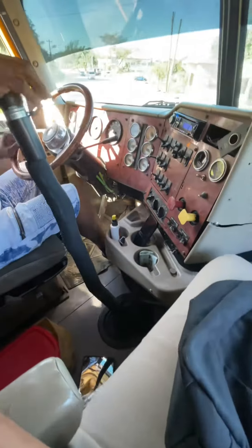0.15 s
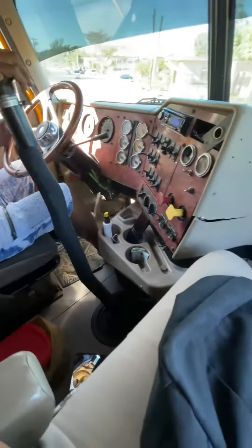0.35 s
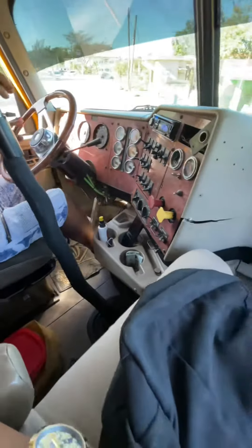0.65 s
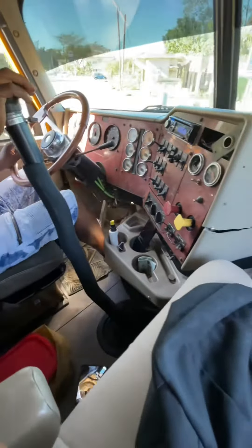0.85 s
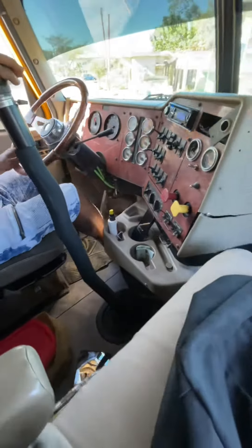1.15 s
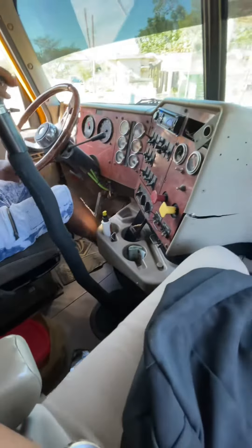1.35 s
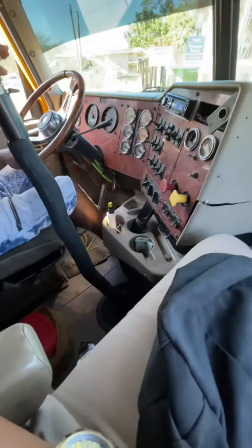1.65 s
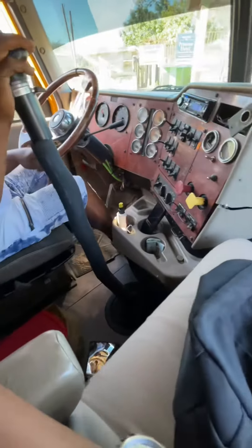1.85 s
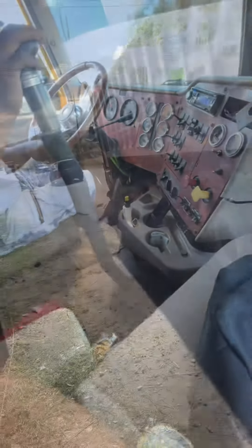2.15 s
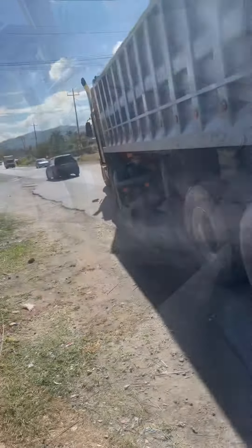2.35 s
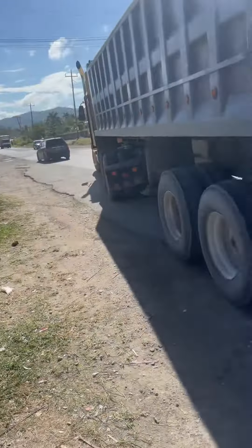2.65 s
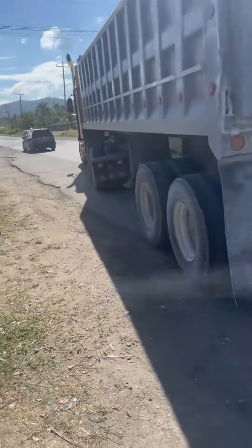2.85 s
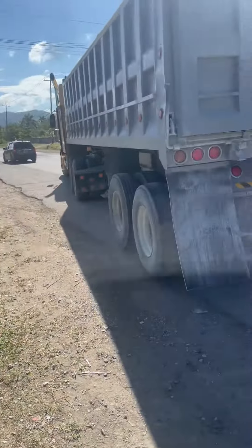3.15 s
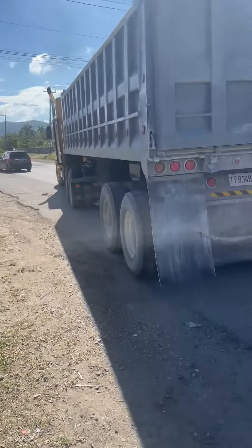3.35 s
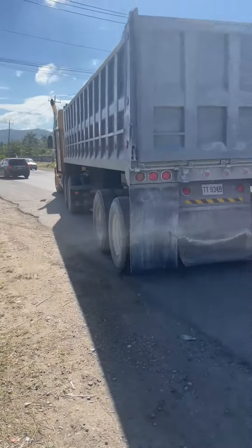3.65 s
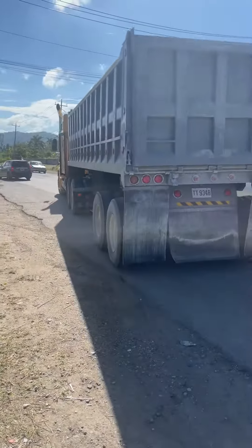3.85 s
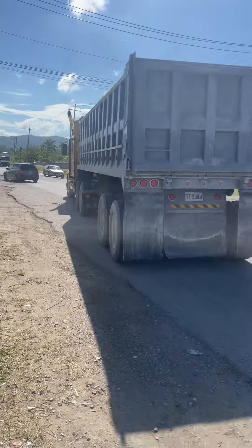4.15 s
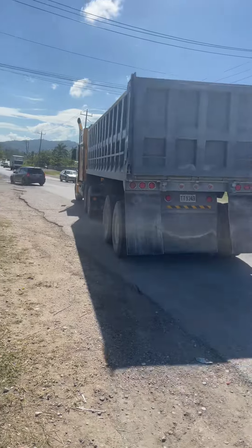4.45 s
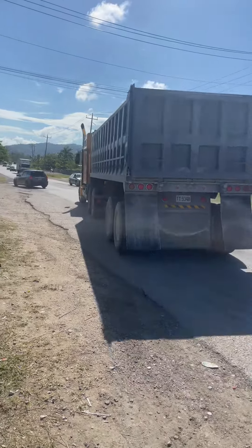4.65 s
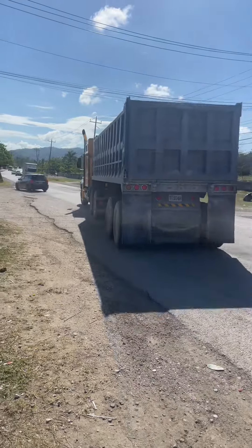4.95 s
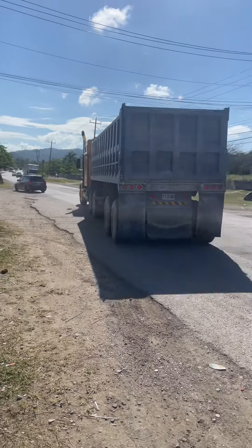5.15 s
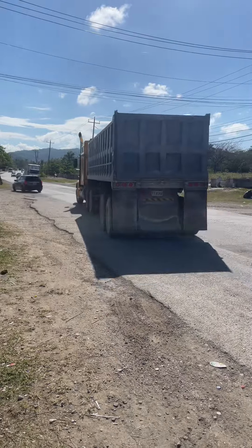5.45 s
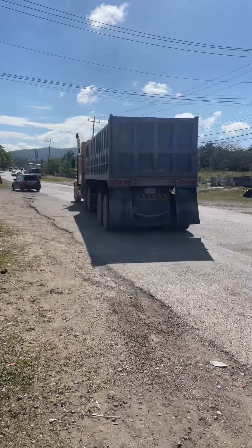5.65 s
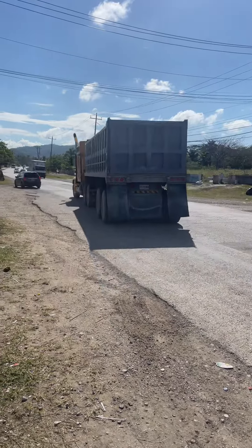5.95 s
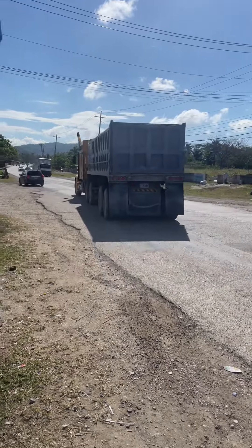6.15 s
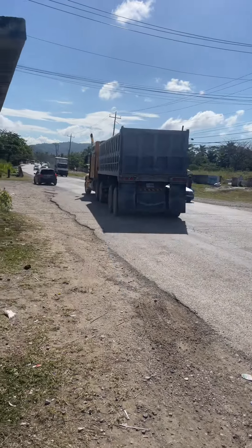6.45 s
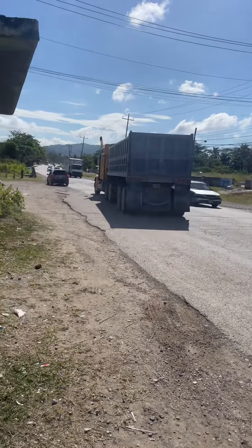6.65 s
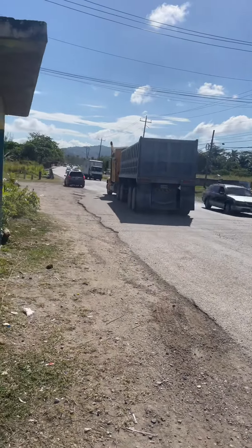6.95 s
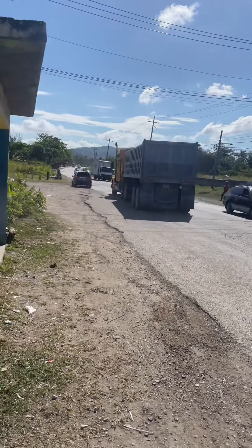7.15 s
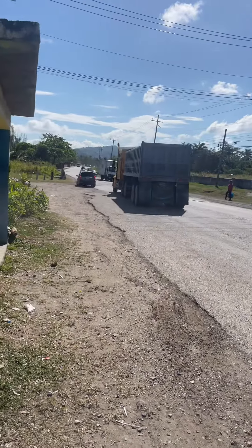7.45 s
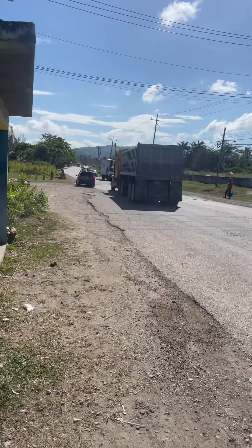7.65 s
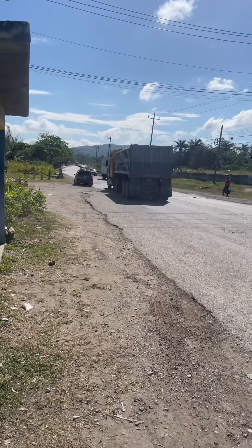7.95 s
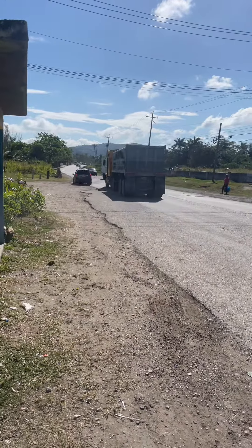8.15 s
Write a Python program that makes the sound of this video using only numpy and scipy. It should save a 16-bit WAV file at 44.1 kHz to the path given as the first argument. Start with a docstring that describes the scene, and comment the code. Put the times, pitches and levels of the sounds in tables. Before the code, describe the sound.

From 0 to 2.1 seconds we are inside a truck cab: a thick, muffled diesel drone sinks in pitch, panels boom and ring near 1.2, low shudders come around 1.5 and 1.7, and two short valve puffs hiss near 1.65 and 1.8. At 2.1 the sound cuts sharply to the roadside. The open exhaust roars in five pulls, about 2.1-3.1, 3.7-4.5, 4.9-5.6, 6.0-6.6 and 7.1-8.0. Each bites abruptly with hollow barks, rasp and sharp knocks, climbs slightly, then lifts off into a smoother falling drone. Intake air rushes through, with thin high whistles near 3.3 and 4.8. Tyres and trailer rumble, and running gear sings briefly around 3.5 as the axles pass. The rolling noise recedes, road reflections colour the exhaust, and after 8 the revs sink again. Wide, close outdoor stereo.

```python
"""A six-cylinder diesel truck with open stacks, first from inside the cab: the revs sink towards idle,
firings drone through the floor, panels boom, and valves let out puffs of filtered noise.
Then from the roadside it pulls away through five gears, each firing a pressure step and a gas puff
that growls, barks and rasps from the stack and bounces off the road. Between gears turbo air and a
thin whistle come through, with the noise of tyres and trailer; at the end the revs sink again."""
import sys
import numpy as np
from scipy import signal
from scipy.fft import rfft, irfft
from scipy.io import wavfile
from scipy.ndimage import uniform_filter1d, minimum_filter1d

SR = 44100
rng = np.random.default_rng(int(sys.argv[2]) if len(sys.argv) > 2 else 0)


def put_to_file(sound):
    """Save the sound as 16-bit audio at rate SR, in the file named by the first command-line argument."""
    columns = np.atleast_2d(sound).T  # one column per channel
    safe = np.clip(columns, -1, 1)
    whole_steps = np.round(safe * 32767)
    wavfile.write(sys.argv[1], SR, whole_steps.astype(np.int16))


N = 365588
TIME = np.arange(N) / SR  # s
BINS = np.fft.rfftfreq(2 ** 19, 1 / SR)  # Hz


def amp(db):
    """Decibels to gain."""
    return np.exp(np.asarray(db) * (np.log(10) / 20))


def unit(x):
    """Scales to rms 1."""
    return x / np.sqrt(np.mean(x ** 2) + 1e-20)


def curves(rows):
    """Each column of a table after the first as a curve over time."""
    s, *columns = np.transpose(rows)
    return [np.interp(TIME, s, column) for column in columns]


def read(points, hz):
    """A spectrum's value at hz, interpolated along log frequency."""
    f, value = np.transpose(points)
    return np.interp(np.log(hz + 1), np.log(f + 1), value)


def response(points, size=8192):
    """Causal, minimum-phase impulse response with the given spectrum."""
    hz = abs(np.fft.fftfreq(size, 1 / SR))
    log_gain = np.log(amp(np.maximum(read(points, hz), -100)))
    spectrum = np.exp(np.conj(signal.hilbert(log_gain)))
    return np.fft.ifft(spectrum).real[:size // 2]


def colour(x, points):
    """Filters to the given spectrum, rms 1."""
    return unit(signal.oaconvolve(x, response(points))[:N])


def drift(rate_hz, size=2 ** 14):
    """Smooth random wandering, rms 1."""
    s = np.linspace(0, N / SR, size)
    hz = np.fft.rfftfreq(size, s[1])
    smooth = irfft(rfft(rng.standard_normal(size)) / (1 + (hz / rate_hz) ** 4))
    return unit(np.interp(TIME, s, smooth))


def hiss(points, flutter_db):
    """Turbulent noise whose level flutters."""
    return colour(rng.standard_normal(N) * amp(flutter_db * drift(21)), points)


def tone(turns):
    """A sine of rms 1 from its running count of cycles."""
    return np.sqrt(2) * np.sin(2 * np.pi * turns)


def resonate(x, hz, width):
    """One damped resonance; hz may be a curve."""
    r = np.exp(-np.pi * width / SR)
    if np.ndim(hz) == 0:
        return signal.lfilter([1 - r], [1, -r * np.exp(2j * np.pi * hz / SR)], x).real
    # a moving resonance: shift it down to zero frequency, smooth, shift back
    turn = np.exp(2j * np.pi * np.cumsum(hz) / SR)
    return (turn * signal.lfilter([1 - r], [1, -r], x * turn.conj())).real


def resonate_twice(x, hz, width):
    """Two equal resonances in a row, for a steeper peak."""
    return resonate(resonate(x, hz, width), hz, width)


def ring(x, modes):
    """Rings a duct's narrow resonances."""
    return sum(amp(db) * unit(resonate(x, hz, width)) for hz, width, db in modes)


def steady(x, size=6000):
    """Holds the slow level at rms 1."""
    power = uniform_filter1d(uniform_filter1d(x ** 2, size), size // 2)
    return x / np.sqrt(abs(power) + 1e-9)


def swell(s, length):
    """A bell-shaped rise and fall centred on s."""
    return np.exp(-np.minimum((2 * (TIME - s) / length) ** 2, 20))


def burst(s, length):
    """A swell centred on s with a flatter top and steeper sides."""
    return np.exp(-np.minimum((2 * (TIME - s) / length) ** 4, 20))


def reflections(x, decay_s, size=4096):
    """A dense cluster of dying echoes, its spectrum flattened so that only phases are scrambled."""
    t = np.arange(size) / SR
    taps = rng.standard_normal(size) * np.exp(-t / decay_s)
    even = irfft(np.exp(1j * np.angle(rfft(taps))))
    return signal.oaconvolve(x, even)[:N]


def shifting(x, decay_s, rate):
    """Echoes whose pattern keeps changing, turning between two clusters."""
    angle = 2 * np.pi * rate * (TIME + drift(0.95) / 10)
    return np.cos(angle) * reflections(x, decay_s) + np.sin(angle) * reflections(x, decay_s)


def firings(turns, cylinders, uneven_db, rough, puff_s):
    """One pressure step a firing, followed by a short puff of turbulent gas."""
    size_db, lag_s = np.transpose(cylinders)
    n = np.arange(1, int(turns[-1]))
    cylinder = n % len(lag_s)
    at = np.interp(n, turns, np.arange(N)) + SR * lag_s[cylinder]
    at = np.clip(at, 0, N - 1).astype(int)
    chance = np.clip(rng.standard_normal(len(n)), -2, 2)
    kicks = np.zeros(N)
    kicks[at] = amp(size_db[cylinder] + uneven_db * chance)
    puff_level = signal.lfilter([1], [1, -np.exp(-1 / (puff_s * SR))], kicks)
    puffs = puff_level * rng.standard_normal(N)
    return np.sqrt(1 - rough) * unit(kicks - kicks.mean()) + np.sqrt(rough) * unit(puffs)


# The bounce off the road, heard from the roadside; close up the trailer screens it.
# Each row: time in seconds, comb spacing in Hz, strength from 0 to 1.
ROAD_BOUNCE = [(2.1, 369, 0.17), (2.8, 402, 0.18), (3.75, 470, 0.37), (4.25, 500, 0.4), (4.95, 532, 0.52),
               (5.4, 571, 0.32), (6.0, 621, 0.55), (6.55, 642, 0.56), (7.1, 772, 0.64), (7.4, 775, 0.95),
               (7.85, 885, 0.5), (8.3, 970, 0.3)]


def mirrored(x):
    """The road mirrors the stack; the echo closes in as the truck draws away."""
    spacing_hz, strength = curves(ROAD_BOUNCE)
    echo = np.interp(TIME - 1 / spacing_hz, TIME, x)
    return (x + strength * echo) / np.sqrt(1 + strength ** 2)


def off_road(x):
    """A running sound with its road echo, held at rms 1."""
    return steady(mirrored(x))


# Tyres, gears and trailer from the roadside. Each row: time in seconds, level in dB.
ROLLING_LEVEL = [(2.1, -19), (3.2, -21.5), (3.6, -22.5), (4.7, -21.5), (5.8, -23.5), (6.85, -24.5),
                 (8.29, -28)]
# Their tone. Each row: frequency in Hz, relative density in dB per Hz.
ROLLING_SPECTRUM = [(20, -33.5), (45, -5), (80, -1), (170, 0.5), (260, 1), (500, -11), (700, -9),
                    (1050, -13), (1600, -17), (2100, -23.5), (2750, -30), (3300, -33), (4400, -43),
                    (7000, -59.5), (12000, -56.5)]


def rolling():
    """Tyres and trailer rumble along the road as broad noise, heard direct and with its road echo."""
    roar = hiss(ROLLING_SPECTRUM, flutter_db=1.5)
    level_db, = curves(ROLLING_LEVEL)
    return amp(level_db) * unit(off_road(roar) + roar)


# The trailer's running gear singing as it passes the roadside.
# Each row: centre in seconds, length in seconds, pitch in Hz, width of each resonance in Hz, level in
# dB before the swell.
AXLE_TONES = [(3.426, 0.3, 955, 130, -33), (3.45, 0.23, 1376, 130, -34), (3.5, 0.16, 4330, 350, -43),
              (3.577, 0.22, 5220, 480, -39)]


def running_gear():
    """Rubbing noise excites narrow tones that swell and fade as the trailer's axles draw past."""
    rub = rng.standard_normal(N) * amp(5.2 * drift(45))
    out = np.zeros(N)
    for s, length, hz, width, db in AXLE_TONES:
        out += amp(db) * swell(s, length) * unit(resonate_twice(rub, hz, width))
    return out


# The turbo's air from the roadside, added to a steady flow.
# Each row: centre in seconds, length in seconds, intake hiss in dB, turbo spill in dB.
AIR_RUSHES = [(2.455, 0.61, -34.5, -54), (3.337, 0.34, -36.5, -63), (3.66, 0.49, -36, -54),
              (4.747, 0.31, -35.5, -64), (4.956, 0.23, -36, -47), (5.77, 0.42, -42, -63),
              (6.33, 0.5, -34.5, -61), (6.894, 0.61, -50, -61), (7.404, 0.37, -37, -74),
              (8.157, 0.27, -44, -61)]
# The whistle of the turbo running down between gears.
# Each row: centre in seconds, length in seconds, pitch at the centre in Hz, level in dB.
TURBO_WHISTLE = [(3.336, 0.3, 9260, -50), (4.833, 0.3, 9900, -53.5)]
# Tone of the intake hiss. Each row: frequency in Hz, relative density in dB per Hz.
INTAKE_SPECTRUM = [(1500, -23.5), (2300, 12), (2750, 8.5), (3400, 5.5), (4300, 1.5), (4900, 1), (5600, -3),
                   (6700, 2.5), (7600, -18), (9000, -15), (12000, -50.5)]
# Narrow resonances of the intake ducts. Each row: frequency in Hz, width in Hz, level in dB re the hiss.
INTAKE_DUCTS = [(2660, 200, -9), (3000, 160, -6.5), (4343, 230, -15), (5530, 370, -12.5)]
# Tone of the spilled air. Each row: frequency in Hz, relative density in dB per Hz.
SPILL_SPECTRUM = [(6000, -38), (7700, -9.5), (8600, 10), (9800, 3.5), (11500, 0), (13000, -10.5),
                  (15000, -15)]
STEADY_INTAKE_DB, STEADY_SPILL_DB = -41.5, -57.5  # flow between rushes
WHISTLE_SINK_HZ_PER_S = 1700


def turbo():
    """Air hisses through the intake and spills, with a thin whistle, as the load comes off and on."""
    intake, spill, whistle = amp(STEADY_INTAKE_DB), amp(STEADY_SPILL_DB), 0
    for s, length, intake_db, spill_db in AIR_RUSHES:
        rush = swell(s, length)
        intake = intake + amp(intake_db) * rush
        spill = spill + amp(spill_db) * rush
    for s, length, hz, db in TURBO_WHISTLE:
        turns = np.cumsum(hz - WHISTLE_SINK_HZ_PER_S * (TIME - s)) / SR
        whistle = whistle + amp(db) * swell(s, length) * tone(turns)
    flow = hiss(INTAKE_SPECTRUM, flutter_db=1.5)
    ducted = unit(flow + ring(flow, INTAKE_DUCTS))
    # the whistle's level wavers at random
    return whistle * drift(160) + intake * ducted + spill * hiss(SPILL_SPECTRUM, flutter_db=1.8)


# Air let out by the gearshift valves, inside the cab.
# Each row: centre in seconds, length in seconds, level in dB.
VALVE_PUFFS = [(1.654, 0.08, -45.5), (1.778, 0.059, -48)]


def valves():
    """Short bursts of filtered noise as the gearshift valves let out air."""
    level = sum(amp(db) * burst(s, length) for s, length, db in VALVE_PUFFS)
    return level * hiss([(1500, -7), (3500, 2), (6000, 1), (12000, -17)], flutter_db=1.5)


# The cab shuddering on its mounts.
# Each row: centre in seconds, length in seconds, pitch in Hz, level in dB.
CAB_SHUDDERS = [(1.46, .15, 58, -22), (1.67, .13, 58, -23)]


def shudder():
    """Brief low tones as the cab shudders on its mounts."""
    return sum(amp(db) * burst(s, length) * tone(hz * TIME) for s, length, hz, db in CAB_SHUDDERS)


# Engine speed heard from the cab. Each row: time in seconds, firing rate in Hz.
CAB_FIRING_RATE = [(0.0, 80.3), (0.12, 71.48), (0.55, 67.7), (0.8, 61.4), (1.0, 54.6), (1.29, 48.28),
                   (1.41, 44.56), (1.6, 43.02), (1.86, 46.17)]
# Levels in the cab. Each row: time in seconds, drone in dB before the harmonic's own level, engine
# growl in dB, panel boom in dB before a cut of 8.5 dB.
CAB_MIX = [(0.0, 0, -17, -11.5), (0.5, 2.5, -16.5, -14.5), (0.95, -5.5, -20.5, -13.5),
           (1.2, -7.5, -21.5, -20), (1.4, -6.5, -28.5, -11.5), (1.52, -45, -37, -17.5),
           (1.68, -22, -32.5, -18.5), (1.78, -26, -43.5, -29), (1.88, -9.5, -34, -47),
           (2.12, -11, -30.5, -20)]
# How loudly the cab carries a firing harmonic. Each row: frequency in Hz, level in dB.
CAB_HARMONICS = [(44, -18.5), (55, -10.5), (66, -19), (76, -34.5), (98, -21.5), (112, -29), (135, -16.5),
                 (150, -26), (168, -6), (200, -30.5), (220, -19.5)]
# Pulses as they reach the cab, in firing order. Each row: strength in dB, lag in seconds.
CAB_PULSES = [(0, 0), (-4, .0015), (-2, -.0012), (-1, .0003), (-4.5, .0018), (-2, -.001)]
# A cab panel ringing out as the revs sink through it: centre in seconds, length in seconds, rise in dB.
RINGING_PANEL = (1.22, 0.88, 6.1)
# Tone of the growl through the cab's body. Each row: frequency in Hz, relative density in dB per Hz.
CAB_GROWL_SPECTRUM = [(70, -24.5), (140, -14), (230, 4), (270, -3.5), (300, -10), (370, -2.5), (440, 1),
                      (510, -16.5), (600, -6), (700, -22), (800, -7.5), (950, -24), (1200, -22.5),
                      (1500, -39), (2300, -46), (5000, -72)]
# Tone of the air hiss in the cab. Each row: frequency in Hz, relative density in dB per Hz.
CAB_AIR_SPECTRUM = [(500, 7), (1200, -7), (2000, -11), (3000, -12.5), (4300, -17.5), (6200, -16),
                    (8000, -14.5), (11000, -42), (14000, -37)]
CAB_AIR_DB = -29.5  # at the growl's loudest
CAB_AIR_FOLLOW = 0.48  # share of the growl's fall in dB that the air follows


def cab():
    """Firings come through the floor, dulled, and set the panels booming."""
    hz, = curves(CAB_FIRING_RATE)
    drone_db, growl_db, boom_db = curves(CAB_MIX)
    turns = np.cumsum(hz * (1 + 0.001 * drift(13))) / SR
    drone = sum(amp(drone_db + read(CAB_HARMONICS, k * hz)) * tone(k * turns) for k in range(1, 4))

    drive = firings(turns, CAB_PULSES, uneven_db=1.5, rough=0.12, puff_s=0.042)
    drive = reflections(drive, decay_s=0.01)
    ring_s, ring_length, ring_db = RINGING_PANEL
    panel_level = amp(-6 + ring_db * swell(ring_s, ring_length))
    panel = unit(resonate(drive, 297.2, width=14))
    growl = amp(growl_db) * steady(colour(drive, CAB_GROWL_SPECTRUM) + panel_level * panel)
    boom = amp(boom_db - 8.5) * steady(resonate_twice(drive, 164, width=25))

    rumble_spectrum = [(20, -47), (45, -3.0), (100, -4.0), (200, -14.5), (500, -20.5), (1500, -56.5)]
    rumble = amp(-30.0) * hiss(rumble_spectrum, flutter_db=2)
    air_db = CAB_AIR_DB + CAB_AIR_FOLLOW * (growl_db - growl_db.max())
    air = amp(air_db) * hiss(CAB_AIR_SPECTRUM, flutter_db=1.5)
    return drone + growl + boom + rumble + shudder() + valves() + air


# The five gears: revs surge as the clutch takes up, climb under load, then sink until the next gear.
# Each row: start in seconds, surge's end in seconds, lift-off in seconds, then the firing rate in Hz
# at each of those three moments.
GEAR_RUNS = [(2.119, 2.59, 3.099, 60.14, 86.42, 90.52), (3.629, 3.876, 4.533, 69.0, 86.63, 89.34),
             (4.874, 4.999, 5.551, 74.49, 84.42, 86.38), (5.922, 6.03, 6.622, 72.19, 78.2, 85.76),
             (7.03, 7.1, 7.968, 66, 72.7, 85.3)]
COAST_HZ_PER_S = 39  # how fast the firing rate sinks after the last gear


def road_revs():
    """Firing rate through the gears: surge, climb, sink."""
    gears = np.array(GEAR_RUNS)
    s, hz = gears[:, :3].ravel(), gears[:, 3:].ravel()
    return np.interp(TIME, s, hz) - COAST_HZ_PER_S * np.maximum(TIME - s[-1], 0)


ATTACK_S, RELEASE_S = 0.03, 0.07


def press(start, end):
    """Quick attack, hold, and a release once the pedal lifts."""
    attack = (1 + np.tanh(2 * (TIME - start) / ATTACK_S)) / 2
    release = (1 - np.tanh(2 * (TIME - end) / RELEASE_S)) / 2
    return attack * release


# How loudly the stack carries a firing harmonic. Each row: frequency in Hz, level in dB.
STACK_HARMONICS = [(60, -24.5), (70, -17), (80, -13.5), (89, -17.5), (120, -34.5), (138, -21), (151, -26),
                   (161, -24), (168, -20.5), (180, -29), (205, -36), (222, -27), (236, -25.5), (255, -35),
                   (320, -51), (355, -29), (380, -19)]
KICK_DB, KICK_S = 0.5, 0.031  # the second harmonic is louder for a moment as each gear starts
OVERTONE_WAVER_DB, WAVER_HZ = 3.7, 2.7  # each overtone wavers on its own; rms depth


def stack_drone(turns, hz, load, second, third, fourth):
    """The lowest firing harmonics swell as they slide through the resonances of the stack."""
    # the pressure in the stack crests an eighth of a cycle before each crack
    angle = 2 * np.pi * (turns + 1 / 8)
    kick = amp(KICK_DB * sum(swell(start + KICK_S, 2 * KICK_S) for start, *_ in GEAR_RUNS))
    out = load * amp(read(STACK_HARMONICS, hz)) * np.cos(angle)
    for k, level in [(2, second * kick), (3, third), (4, fourth)]:
        carried = amp(read(STACK_HARMONICS, k * hz) + OVERTONE_WAVER_DB * drift(WAVER_HZ))
        out = out + level * carried * np.sin(k * angle)
    return np.sqrt(2) * out


# Single firings that crack out of the stack above the rest. Each row: start in seconds, level in dB
# before RAP_DB, crack relative to the knock in dB before CRACK_DB.
LOUD_FIRINGS = [(2.159, -5, -13), (2.25, -3, -14), (2.294, -6, -18), (2.31, -3, -23), (2.338, -5.5, -15),
                (2.378, -5, -10), (2.416, -2, -13), (2.455, -10, -15), (2.493, -9, -21), (2.564, -13, -25),
                (3.694, -16, -24), (3.733, 1, -20), (3.809, -5, -24), (3.858, -4.5, -26), (3.88, -7, -20),
                (3.926, -12, -19), (4.133, -10, -33), (4.338, -13, -19), (4.911, -6, -17), (4.935, 9, -18),
                (4.959, 8, -19), (4.984, 2, -17), (5.007, -8, -17), (5.22, -6, -13), (5.29, -10, -12),
                (5.98, -6.5, -20), (6.031, -3, -21), (6.069, -11, -24), (6.107, -7, -28), (6.145, -2, -25),
                (6.183, 7.5, -25), (6.257, -7, -15), (6.331, -3, -20), (6.403, -1.5, -22),
                (6.44, -10.5, -18), (6.512, -13.5, -24), (6.547, -18, -21), (6.616, -10, -25),
                (7.097, -4.5, -19), (7.178, -13.5, -12), (7.258, -7, -5.5), (7.367, -7, -10),
                (7.418, -7.5, -2), (7.569, -8.5, -18), (7.645, -6, -19), (7.718, -8, -19),
                (7.791, -5.5, -21), (7.934, -14, -13)]
# Tone of the hollow knock. Each row: frequency in Hz, relative density in dB per Hz.
KNOCK_SPECTRUM = [(200, -16), (550, 5.5), (750, 7), (950, 3), (1400, -1), (1900, -9.5), (4000, -34.5),
                  (7500, -60.5)]
# Tone of the crack on top. Each row: frequency in Hz, relative density in dB per Hz.
CRACK_SPECTRUM = [(900, -21), (1700, -9), (2100, 5), (2400, 2.5), (2750, 8), (3200, -6), (4300, -16),
                  (6500, -19), (7500, -40)]
RAP_DB, CRACK_DB = 14, 4  # gains of the whole rap and of its crack
RAP_DECAY_S = 0.0012


def raps(size=2048):
    """Now and then one firing bangs out of the stack: a hollow knock with a sharp crack on top."""
    age = np.arange(size) / SR / RAP_DECAY_S
    knock, crack = response(KNOCK_SPECTRUM), response(CRACK_SPECTRUM)
    out = np.zeros(N)
    for s, db, crack_db in LOUD_FIRINGS:
        gas = rng.standard_normal(size) * age ** 2 * np.exp(-age)
        for voice, voice_db in [(knock, 0), (crack, CRACK_DB + crack_db)]:
            bang = signal.fftconvolve(gas, voice)[:size]
            out[round(s * SR):][:size] += amp(RAP_DB + db + voice_db) * bang / np.linalg.norm(bang)
    return mirrored(out)


# Tone of the stack's growl. Each row: frequency in Hz, relative density in dB per Hz.
GROWL_SPECTRUM = [(30, -27), (55, 4), (90, -4), (150, -16.5), (220, 7), (280, -0.5), (350, 3), (480, -1),
                  (650, -4), (1200, -23.5), (3000, -85.5)]


def stack_growl(soft, echo):
    """Low voice of the firings, ringing on in the pipe and along the trailer's side."""
    return off_road(colour(soft + echo * shifting(soft, decay_s=0.011, rate=0.3436), GROWL_SPECTRUM))


# Tone of the bark. Each row: frequency in Hz, relative density in dB per Hz.
BARK_SPECTRUM = [(150, -25.5), (350, -14), (550, 2), (790, 5.5), (1000, -11), (1400, -13), (2000, -23.5),
                 (3000, -22), (7000, -100)]
# The bark's hollow vowel, moving with load and with the angle of the stack.
# Each row: time in seconds, resonance in Hz, level in dB relative to the plain bark.
HOLLOW_VOWEL = [(2.15, 745, -3), (2.55, 690, -1), (3.0, 623, 0), (3.7, 463, -5), (3.95, 454, -1),
                (4.1, 403, 6), (4.5, 406, 7.5), (4.95, 630, -4), (5.4, 643, 5), (6.0, 570, -11.5),
                (6.6, 586, -3), (7.1, 785, -9), (7.95, 790, -3)]
# Tone of the bright blat as a gear bites. Each row: frequency in Hz, relative density in dB per Hz.
BLAT_SPECTRUM = [(500, -20.5), (810, 15), (1050, -11), (1600, -8), (2200, -26), (2750, -2), (3500, -15),
                 (7000, -54)]
BLAT_DB, BLAT_S = -11.5, 0.22  # level relative to the bark, length


def stack_bark(sharp, soft, echo):
    """Hollow voice of the firings, with a bright blat for a moment as each gear bites."""
    barking = sharp + 0.43 * echo * shifting(soft, decay_s=0.011, rate=0.591)
    hollow_hz, hollow_db = curves(HOLLOW_VOWEL)
    hollow = unit(resonate_twice(barking, hollow_hz, width=212))
    bark = off_road(colour(barking, BARK_SPECTRUM) + amp(hollow_db) * hollow)
    bite = sum(swell(start + BLAT_S / 2, BLAT_S) for start, *_ in GEAR_RUNS)
    return bark + amp(BLAT_DB) * bite * off_road(colour(sharp, BLAT_SPECTRUM))


# Tone of the rasp. Each row: frequency in Hz, relative density in dB per Hz.
RASP_SPECTRUM = [(500, -24), (1300, 6), (1800, 11.5), (2150, 3), (2600, 8), (3100, 2.5), (4000, 3.5),
                 (5500, -24), (6700, -24), (8000, -66.5), (12000, -34), (15000, -83)]
# The stack's ring, shifting from gear to gear. Each row: time in seconds, pitch in Hz, gain in dB.
RING_PITCH = [(2.15, 2280, 8), (2.45, 2400, 21), (2.6, 2900, 0), (3.75, 2730, 3), (4.3, 2770, 0),
              (5.0, 2750, 4), (5.5, 2560, -5), (6.05, 2570, -7), (6.4, 2580, -28), (7.15, 2510, -6),
              (7.5, 2530, 0.5), (7.95, 2570, -4)]
# Narrow resonances of the stack. Each row: multiple of the ring's pitch, width in Hz, level in dB
# before the ring's gain.
RING_MODES = [(1, 147, -1.5), (1.24, 200, -12), (1.55, 280, -12.5)]
# Tone of the crackle. Each row: frequency in Hz, relative density in dB per Hz.
CRACKLE_SPECTRUM = [(2000, -17), (3200, 1.5), (4100, 6.5), (5000, -9), (6500, -10.5), (7500, -35)]
CRACKLE_DB = -8.5  # relative to the rasp
SMEAR_S = 0.0008  # bends in the pipe smear each crack a little


def stack_rasp(torn):
    """Torn gas rasps through the pipe, rings its narrow resonances and crackles."""
    tearing = colour(reflections(torn, decay_s=SMEAR_S), RASP_SPECTRUM)
    ring_hz, ring_db = curves(RING_PITCH)
    modes = [(multiple * ring_hz, width, db) for multiple, width, db in RING_MODES]
    ringing = amp(ring_db) * ring(tearing, modes)
    crackle = off_road(colour(torn, CRACKLE_SPECTRUM))
    return steady(mirrored(tearing) + ringing) + amp(CRACKLE_DB) * crackle


# Pulses at the stack, in firing order. Each row: strength in dB, lag in seconds.
STACK_PULSES = [(-6, .0004), (-4, 0), (-2, .0002), (-3, -.0001), (-7, .0005), (-.5, -.0002)]
# Echoes off the trailer's side, fading as the truck draws away.
# Each row: time in seconds, strength from 0 to 1.
TRAILER_SIDE = [(2.1, .8), (5.3, .7), (7.4, .4)]
# The accelerator, held in stages, harder or softer. Each row: start in seconds, end in seconds, drone,
# its second, third and fourth harmonics in dB before the stack's response, growl, bark and rasp in dB
# at the start, then how fast these three ease off in dB per second (negative builds up).
PEDAL_STAGES = [(2.106, 2.301, 2.5, 3.5, 5.5, -1, -20.5, -29.5, -37.5, -21),
                (2.296, 2.607, -1, 3, 5, 0, -13.5, -18, -30, -6),
                (2.627, 3.124, -4, 4.5, -6, 3.5, -16, -34, -60, 11.5),
                (3.679, 3.951, -1.5, 3.5, -10, -2, -14, -13, -26.5, 19.5),
                (4.035, 4.53, -4, 2.5, 0, 4.5, -20.5, -21, -37.5, 10),
                (4.923, 5.03, 1.5, -14, -20, -18, -16, -18.5, -25, -21),
                (5.048, 5.307, -6, 1, 0, -9, -20.5, -24, -33.5, -23.5),
                (5.316, 5.584, -6.5, -6.5, -12, 10, -17, -25.5, -30.5, 33.5),
                (5.964, 6.41, -0.5, 2, -1.5, -4, -19, -14, -27.5, -1),
                (6.417, 6.642, -5.5, 5, -2, 3, -19.5, -15.5, -30.5, 21),
                (7.056, 7.29, -3.5, 1.5, -10, -2, -19, -14.5, -27, 16),
                (7.294, 7.676, -3.5, -8.5, -9, -3, -15.5, -17, -23, 10.5),
                (7.671, 8.004, -8.5, 2, -4, -1, -21.5, -23, -28, 12)]
# drone and overtones with the pedal up, before the stack's response
COAST_DRONE_DB, COAST_SECOND_DB, COAST_UPPER_DB = -13.5, -8, -15


def exhaust():
    """A smooth drone all the time; under load each firing also growls, barks, rasps and crackles."""
    hz = road_revs()
    turns = np.cumsum(hz * (1 + 0.00091 * drift(16.6))) / SR
    soft = firings(turns, STACK_PULSES, uneven_db=2.0, rough=0.08, puff_s=0.015)
    sharp = firings(turns, STACK_PULSES, uneven_db=1.5, rough=0.2, puff_s=0.0045)
    sharp = reflections(sharp, decay_s=SMEAR_S)
    torn = firings(turns, STACK_PULSES, uneven_db=0.6, rough=0.5, puff_s=0.006)
    echo, = curves(TRAILER_SIDE)
    growl = stack_growl(soft, echo)
    bark = stack_bark(sharp, soft, echo)
    rasp = stack_rasp(torn)

    # a faint growl stays while coasting, following the rolling level
    out = amp(curves(ROLLING_LEVEL)[0] - 20.5) * growl
    coast = amp([COAST_DRONE_DB, COAST_SECOND_DB, COAST_UPPER_DB, COAST_UPPER_DB])[:, None]
    harmonics = coast * np.ones(N)
    for start, end, *harmonics_db, growl_db, bark_db, rasp_db, ease_db in PEDAL_STAGES:
        throttle = press(start, end)
        easing = amp(-ease_db * np.clip(TIME - start, 0, end - start))
        voices = amp(growl_db) * growl + amp(bark_db) * bark + amp(rasp_db) * rasp
        out = out + throttle * easing * voices
        harmonics += throttle * (amp(harmonics_db)[:, None] - coast)
    return out + stack_drone(turns, hz, *harmonics) + raps()


# The microphone pair. Each row: frequency in Hz, phase by which the left leads in radians.
PAIR_PHASE = [(200, 0), (400, -.2), (600, .3), (900, -.1), (2000, .25), (3100, 1.8), (3700, 1.2),
              (4400, .7), (5200, .3), (6000, 1.5), (7100, 3.1), (8100, 3.2), (9400, 4.5), (10300, 6.2),
              (12000, 8)]
# Its balance. Each row: frequency in Hz, left minus right in dB.
PAIR_BALANCE = [(130, 0), (280, -.5), (600, -2), (1200, -.7), (2600, -2), (4500, .3), (12000, -.3)]
# Sound that differs between the two. Each row: frequency in Hz, scattered re direct sound in dB.
PAIR_SCATTER = [(150, -36), (300, -15), (550, -9), (1400, -16), (2500, -7), (4500, -3), (6000, -7),
                (7500, -20), (9000, -6), (11500, -9)]


def ports(x):
    """Two microphone ports hear the same wave a little apart, plus scatter that differs between them."""
    size = 2 * len(BINS) - 2
    scatter = amp(read(PAIR_SCATTER, BINS))
    # half of the level and phase difference goes to each side
    tilt = amp(read(PAIR_BALANCE, BINS) / 2) * np.exp(0.5j * read(PAIR_PHASE, BINS))
    direct = rfft(x, size)
    stray = scatter * rfft(shifting(x, decay_s=0.003, rate=1.2), size)
    pair = np.array([(direct + stray) * tilt, (direct - stray) / tilt])
    return irfft(pair / np.sqrt(1 + scatter ** 2))[:, :N]


OUTSIDE_S = 2.128  # the listener moves from the cab to the roadside


def scene():
    """The cab, then the roadside."""
    outside = np.clip((TIME - OUTSIDE_S) / 0.0011, 0, 1)
    roadside = rolling() + running_gear() + turbo() + exhaust()
    return ports((1 - outside) * cab() + outside * roadside)


CEILING, EDGE_HZ = 0.93, 13300  # limiter's full-scale ceiling, top of the band


def record(dry):
    """A fast limiter holds the highest peaks under the ceiling; then the band limit."""
    room = CEILING / np.maximum(abs(dry).max(axis=0), CEILING)
    gain = minimum_filter1d(room, size=129)
    gain = uniform_filter1d(uniform_filter1d(gain, size=65), size=65)
    band = signal.firwin(255, EDGE_HZ, window=("kaiser", 9), fs=SR)
    return signal.oaconvolve(dry * gain, band[None], "same")


dry = scene()
out = record(dry)
put_to_file(out)
```